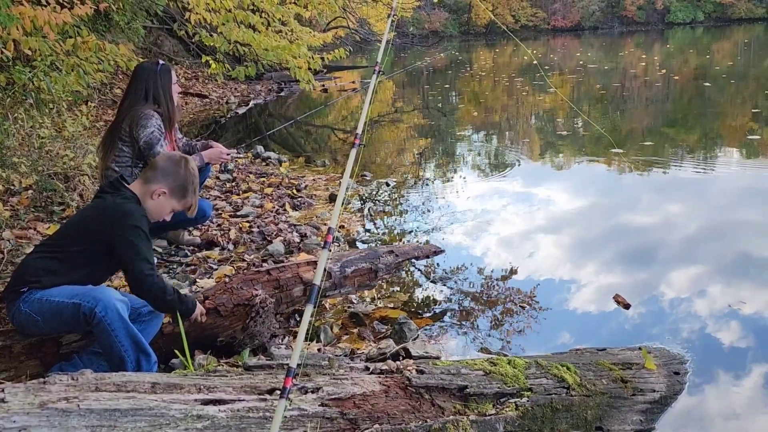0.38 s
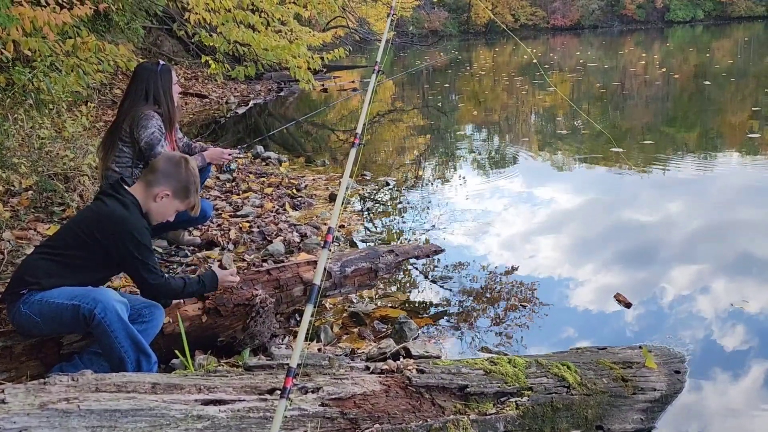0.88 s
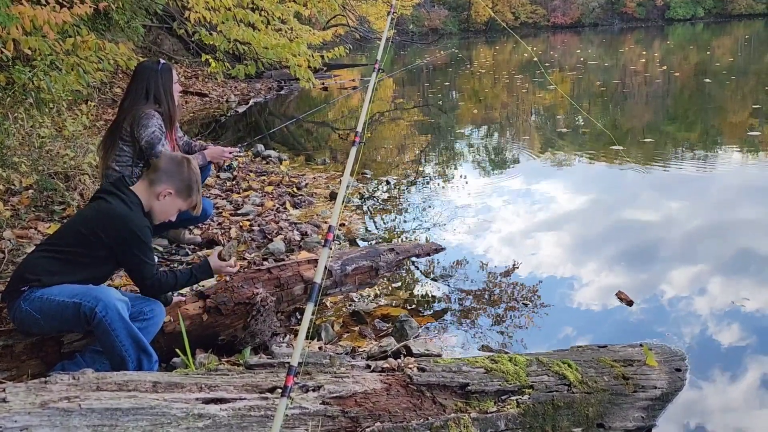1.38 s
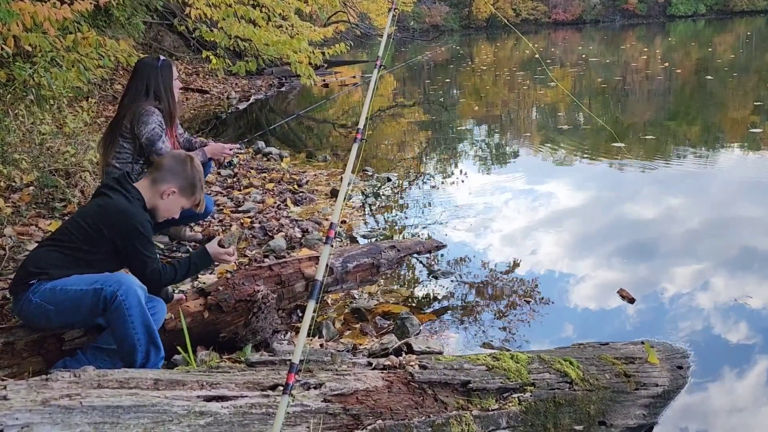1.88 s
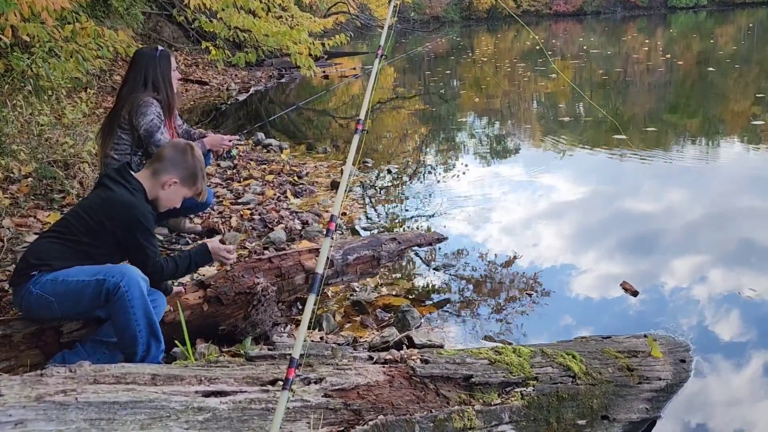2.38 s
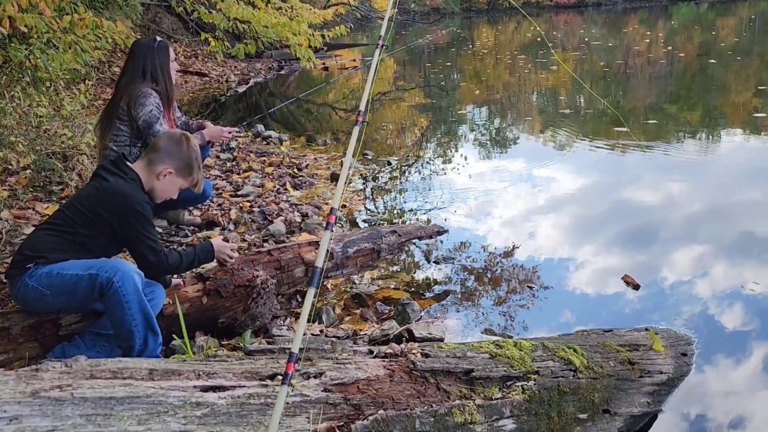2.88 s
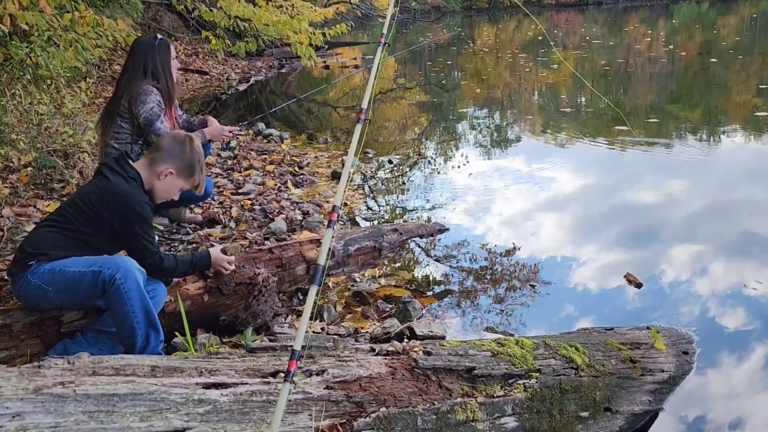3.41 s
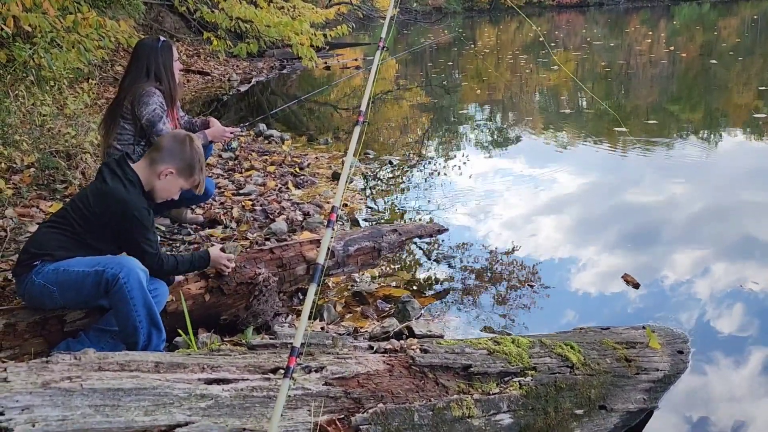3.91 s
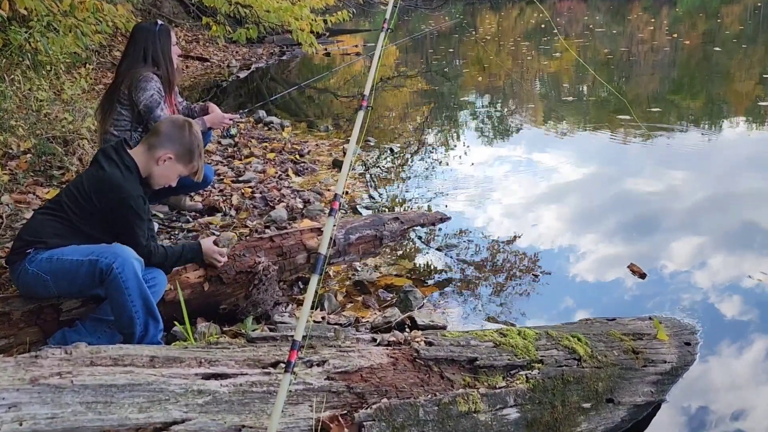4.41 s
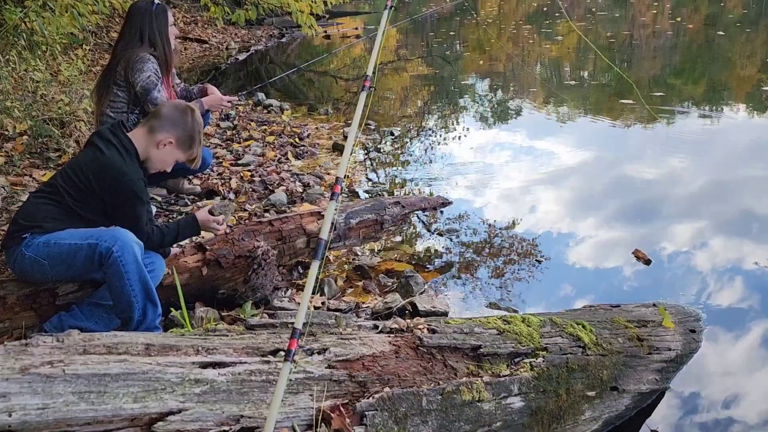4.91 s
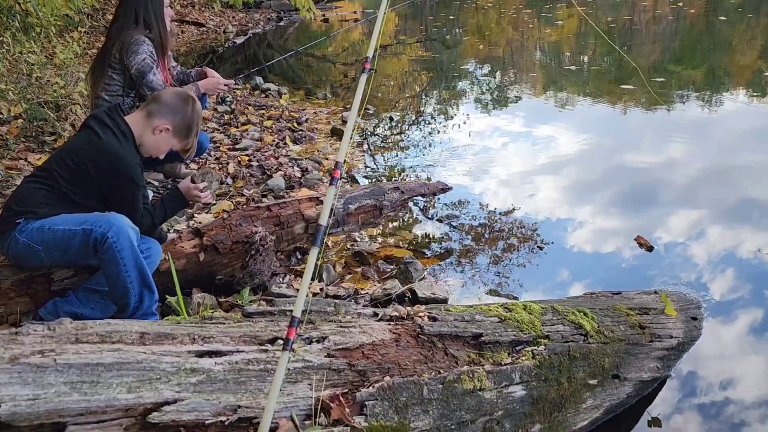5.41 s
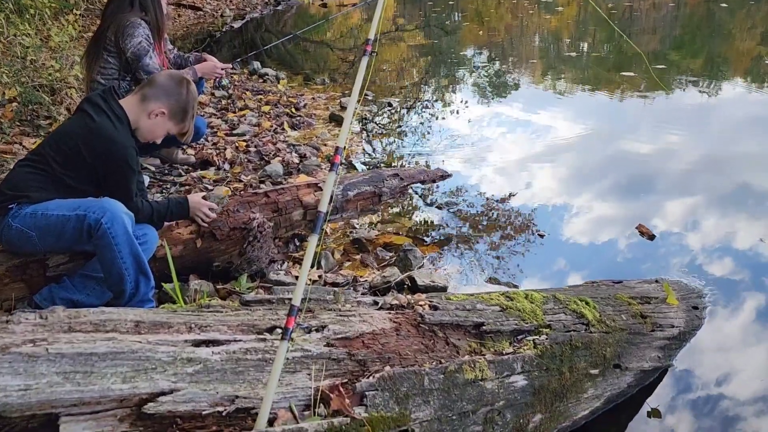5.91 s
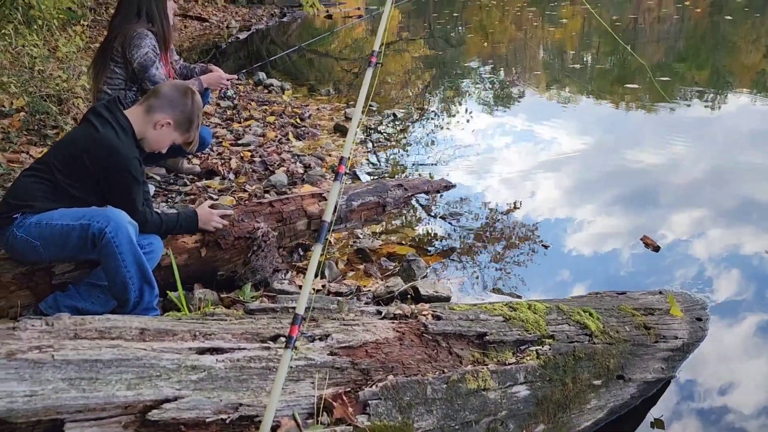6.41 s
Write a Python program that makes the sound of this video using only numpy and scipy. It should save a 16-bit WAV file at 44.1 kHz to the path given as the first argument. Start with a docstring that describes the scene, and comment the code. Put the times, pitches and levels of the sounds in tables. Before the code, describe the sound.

An open lakeside with little echo, heard from a handheld stereo microphone above a walker's feet. A close cricket trills throughout, high tones near 4 to 5 kHz falling rapidly, about 40 strokes per second, quickening to around 50 from 1.6 to 3.6 s and again after 5 s, with small stumbles. Far insects shimmer faintly; distant traffic rumbles low, with weak engine drones in the first second and around 3.5 to 4.5 s. Light taps precede the walk. Hollow wooden footsteps land at about 1.1, 1.6, 2.2, 2.8, 3.4, 4.0, 4.6, 5.1 and 5.8 s: heel click, knock, then short deep thump with slight board rattle. Those at 2.2, 3.4 and 4.0 are loudest; 4.6 is light. Dry ticks and brief cloth swishes fill the gaps, one clearer at 3.6 s, a sharper tap at 5.84, and a last swish at 6.5.

```python
"""A cricket close by trills, switching between a quick and a slow pace, over far insects and distant traffic.
Someone walks along hollow wooden boards by a lake, the phone held above them; each heel clicks, knocks and thumps.
Clothes swish and small things tick and tap between the steps.
The cricket is a train of falling tones; the boards are damped modes struck by smooth pushes;
insects, traffic, grit and cloth are filtered noise, and the engines are gliding sines."""
import sys
import numpy as np
from scipy import signal
from scipy.fft import rfft, irfft
from scipy.io import wavfile
from scipy.ndimage import uniform_filter1d

SR = 44100
rng = np.random.default_rng(int(sys.argv[2]) if len(sys.argv) > 2 else 0)


def log_audio(samples):
    """Write samples as a 16-bit WAV file to the path given in sys.argv[1]."""
    # one column per channel
    frames = np.atleast_2d(samples).T
    # limit to full scale, then quantise
    limited = np.clip(frames, -1, 1)
    pcm = np.round(limited * 32767).astype(np.int16)
    wavfile.write(sys.argv[1], SR, pcm)


def decibels_to_gain(level_db):
    """Convert a level in decibels to a linear amplitude gain (20 dB per decade)."""
    exponent = np.asarray(level_db, float) / 20
    return 10 ** exponent


N = 288529
T = np.arange(N) / SR  # time [s]
SLOW_PACE = 40.083  # wing strokes per s of the cricket at rest


def shape(x, gain):
    """Linear filtering: the spectrum is multiplied by a gain given as a function of frequency."""
    hz = np.fft.rfftfreq(x.shape[-1], 1 / SR) + 1  # 1 Hz up, to avoid zero
    return irfft(rfft(x) * gain(hz), x.shape[-1])


def unit(x):
    """Normalisation by mean power: scale to rms 1."""
    return x / np.sqrt(np.mean(x ** 2))


def bell(hz, width):
    """Simple resonator: gain of a broad resonance."""
    return lambda f: 1 / np.hypot(1, (f - hz ** 2 / f) / width)


def curve(table):
    """Spectral envelope: gain from (frequency [Hz], level [dB]), interpolated over log frequency."""
    hz, db = np.transpose(table)
    return lambda f: decibels_to_gain(np.interp(np.log(f), np.log(hz), db))


def pair(gain, alike_hz, size=N):
    """Spatial coherence: coloured noise at both ports, alike below alike_hz and unrelated above; rms 1."""
    mid, side = rng.standard_normal((2, size))
    side = shape(side, lambda f: f / np.hypot(f, alike_hz))
    return unit(shape(np.array([mid + side, mid - side]), gain))


def walk(rate):
    """Slow modulation: a smoothed random level that takes a new value rate times a second."""
    k = int(SR / rate)
    stairs = np.repeat(rng.standard_normal(N // k + 1), k)
    return 1.6 * uniform_filter1d(uniform_filter1d(stairs, k), k)[:N]


def add(out, x, s, pan_db=0.):
    """Superposition: add a sound at time s, with pan_db as left minus right level."""
    i = max(int(s * SR), 0)
    x = (x * decibels_to_gain(np.array([[pan_db], [-pan_db]]) / 2))[:, :N - i]
    out[:, i:i + x.shape[1]] += x


def pace():
    """Rate modulation: wing strokes per second, slow with quick bouts that speed up, tire and wind down."""
    # quick bouts of the near cricket: (start [s], end [s])
    bouts = [(-3.694, .1084), (1.5771, 3.5747), (5.0478, 7)]
    quick_pace, tiring = 53.864, 1.289  # strokes per s at the start of a bout, and the loss per s
    speed_up_s, wind_down_s = .2532, .1546
    rate = np.full(N, SLOW_PACE)
    for start, end in bouts:
        on = np.clip(T, start, end) - start
        gain = (quick_pace - SLOW_PACE - tiring * on) * np.clip(on / speed_up_s, 0, 1)
        rate = rate + gain * np.exp(-np.maximum(T - end, 0) / wind_down_s)
    return rate


def cricket():
    """Stridulation: each wing stroke is a tone that falls as the file slows; leaves and water scatter it."""
    # the wing catches: (time [s], level change of that stroke [dB])
    catches = [(.158, 0), (1.209, -3), (1.705, -8), (1.807, -10), (1.907, -5), (2.023, -2), (2.121, -7),
               (2.276, -8), (2.411, -14), (2.585, -3), (2.779, -9), (3.012, 0), (3.266, -6), (3.445, -6),
               (3.608, -6), (4.324, 0), (4.378, 0), (5.252, -11), (5.35, -9), (5.467, -5), (5.583, -6),
               (5.738, -1), (5.912, -5), (6.163, -4), (6.474, -8)]
    # the phone turns a little: (time [s], mean stroke level without catches [dB], left minus right [dB])
    turn_path = [(0.0, -57, -0.5), (0.91, -58, -0.5), (2.4, -58, -2), (3.37, -61, -7), (4.3, -61, -4),
                 (5.06, -59, -2.5), (5.6, -55, 0), (6.54, -55, 0)]
    stall, first_stroke = .191, .688  # rhythm lost at each catch and at the outset [strokes]
    start_hz, fall_hz_per_s, lead_s = 4720, 79000, .0073
    rate = pace()
    catch_s, catch_db = np.transpose(catches)
    stalls = stall * np.searchsorted(catch_s + .006, T)
    # the stroke count never runs backwards; it stands still at a stall
    count = np.maximum.accumulate(np.cumsum(rate) / SR - stalls - first_stroke)
    times = T[1:][np.diff(np.floor(count)) > 0]
    slips_db = (np.abs(times[:, None] - catch_s) < .007) @ catch_db
    s, db, pan_db = np.transpose(turn_path)
    chance = rng.standard_normal((len(times), 3))
    voice = np.zeros((2, N))
    for at, slip_db, (a, b, c) in zip(times, slips_db, chance):
        # strokes are cut shorter at the quick pace
        stroke_s = .014 - .00012 * (rate[int(at * SR)] - SLOW_PACE)
        t = T[:int(stroke_s * SR)]
        swell = np.sin(np.pi * (t / stroke_s) ** 1.25) ** .7
        phase = 2 * np.pi * ((start_hz + 20 * a) * t - fall_hz_per_s * t ** 2 / 2)
        tone = np.sin(phase) + decibels_to_gain(-29.5) * np.sin(2 * phase)
        level = decibels_to_gain(np.interp(at, s, db) + slip_db + b)
        add(voice, swell * level * tone, at - lead_s + 0.00027 * c)
    tail = rng.standard_normal((2, 6000)) * 1000. ** (-T[:6000] / .1)  # falls 60 dB in 0.1 s
    tail = tail / np.sqrt(np.sum(tail ** 2, axis=1, keepdims=True))
    scatter = signal.fftconvolve(voice, tail, axes=1)[:, :N]
    tilt = decibels_to_gain(np.interp(T, s, pan_db) / 2)
    # the direct sound reaches the right port 3 samples early
    direct = np.array([tilt * voice[0], np.roll(voice[1], -3) / tilt])
    return direct + decibels_to_gain(-16) * scatter


def insect_chorus():
    """Incoherent summation: many far insects merge into wavering bands of noise."""
    # far insects: (centre [Hz], width of the bell before its fourth power [Hz], mean level [dB])
    bands = [(4090, 1470, -73), (5290, 3200, -84), (7850, 1800, -85.5), (13900, 2600, -93.5)]
    out = np.zeros((2, N))
    for hz, width, db in bands:
        out = out + decibels_to_gain(db + walk(3)) * pair(lambda f: bell(hz, width)(f) ** 4, 1500)
    return out


def traffic():
    """Broadband radiation: rumble and tyre roar are coloured noise that comes and goes."""
    # traffic comes and goes: (time [s], rumble level before its random wander [dB])
    swell_path = [(0.0, -50), (0.9, -51.5), (3.2, -51.5), (3.5, -47.5), (4.9, -51), (5.7, -49),
                  (6.25, -52.5), (6.54, -49)]
    # relative spectral density of the rumble: (frequency [Hz], level [dB])
    rumble_curve = [(15, -25), (30, 0.5), (50, 6), (80, 6), (118, 3.5), (151, -7), (190, 0), (230, -8.5),
                    (310, -12), (500, -25), (900, -54.5)]
    # relative spectral density of the tyre roar: (frequency [Hz], level [dB])
    roar_curve = [(150, -66), (250, -12), (514, -7.5), (778, -13.5), (897, -15.5), (1000, -13.5),
                  (3400, -22), (4420, -75), (7480, -120)]
    tyres_db, tyres_follow = -71, 1  # middle level of the roar, share of the traffic swell that it follows
    traffic_db = np.interp(T, *np.transpose(swell_path))
    out = decibels_to_gain(traffic_db + 0.95 * walk(4.11)) * pair(curve(rumble_curve), 600)
    roar = decibels_to_gain(np.array([[.8], [-.8]])) * pair(curve(roar_curve), 720)  # a little to the left
    roar = roar * decibels_to_gain(tyres_db + tyres_follow * (traffic_db - traffic_db.mean()))
    # the air makes each stretch of the roar swell and sink on its own
    edges_hz = [0, 500, 800, 1300, 2000, SR]
    for low, high in zip(edges_hz, edges_hz[1:]):
        out = out + decibels_to_gain(2 * walk(6)) * shape(roar, lambda f: (f >= low) & (f < high))
    return out


def engines():
    """Frequency modulation: distant engine drones are sines that bend in pitch and waver in level."""
    # distant engines: (mean rms level [dB], pitch as a list of (time [s], frequency [Hz]))
    drones = [(-59.5, [(0, 126.8), (.55, 119), (1.05, 97.9)]), (-63, [(0, 193.7), (.3, 189.7),
              (1., 192.8)]), (-55, [(3.5, 131.7), (3.88, 139), (4.3, 139.7), (4.55, 122)])]
    out = np.zeros((2, N))
    for db, bend in drones:
        s, hz = np.transpose(bend)
        # 0.15 s ramps before the first and after the last pitch point
        fade = np.clip(np.minimum(T - s[0] + .15, s[-1] + .15 - T) / .15, 0, 1)
        phase = 2 * np.pi * np.cumsum(np.interp(T, s, hz)) / SR
        out = out + np.sqrt(2) * fade * decibels_to_gain(db + 2.3 * walk(11.83)) * np.sin(phase)
    return out


def ports(x):
    """Path difference: sound from below reaches the left port first; peak 1."""
    lag = 7  # samples
    return np.array([x, np.roll(x, lag)]) / np.abs(x).max()


def strike(push_ms, scatter_db):
    """Modal radiation: pressure follows the acceleration of the modes under a smooth push."""
    # modes of the boards: (frequency [Hz], acceleration level [dB], time to fall 60 dB without the sole [s])
    modes = [(72.4, -18.5, 0.24), (106.7, 1.5, 0.085), (138.6, -4.5, 0.1), (163.8, -12, 0.13),
             (204.7, -0.5, 0.096), (281, -10.5, 0.13), (350, 3.5, 0.087), (397.3, 4, 0.075),
             (461, 6, 0.089), (520, 7, 0.09), (702, -12, 0.22), (857, 0.5, 0.1), (1113, -8, 0.096),
             (1450, -19, 0.028), (1810, -23, 0.028), (2210, -16, .02), (2900, -15, .015)]
    board_spread = 0.048  # no two boards are tuned alike; relative spread of the high modes
    sole_damps_s = 0.026  # the sole stays down and damps the high modes
    t = T[:SR // 3, None]
    hz, db, t60 = np.transpose(modes)
    chance = rng.standard_normal((3, len(hz)))
    high = hz > 300
    # each blow lands on another spot, and the high modes swing either way under it
    gains = decibels_to_gain(db + scatter_db * chance[0]) * np.where(high, np.sign(chance[1]), 1)
    hz = hz * (1 + board_spread * high * chance[2])
    fade = 1000. ** (-t / t60) * np.exp(-t * high / sole_damps_s)
    move = (gains / hz ** 2 * np.sin(2 * np.pi * hz * t) * fade).sum(axis=1)
    push = np.hanning(int(push_ms * SR / 1000) + 3)
    return np.diff(np.convolve(move, push), n=2)[:len(t)]


def knock(push_ms, scrape_s, low_hz):
    """Light impact: a hard edge meets the grain in quick contacts, too light to bend the whole board."""
    t = T[:800]
    touch = rng.standard_normal(800) * np.exp(-t / scrape_s) * (1 - np.exp(-t / 0.00096))
    x = signal.fftconvolve(strike(push_ms, 0.32), touch)
    return ports(signal.sosfilt(signal.butter(2, low_hz, "high", fs=SR, output="sos"), x))


def light_taps():
    """Contact damping: whatever taps the boards stays in touch and damps the ring."""
    # light taps on the boards: (time [s], level before damping [dB], left minus right [dB])
    tap_list = [(0.239, -44, 7), (0.728, -54, 12), (0.779, -53, 13), (1.157, -46, 5), (1.582, -44, 8),
                (1.866, -53, 0), (1.894, -53.5, 19), (2.047, -53, 16), (5.276, -51.5, 9),
                (5.843, -35.5, 11)]
    out = np.zeros((2, N))
    for s, db, pan_db in tap_list:
        tap = knock(1.23, 0.0017, 220)
        add(out, decibels_to_gain(db) * tap * np.exp(-T[:tap.shape[1]] / .012), s, pan_db)
    return out


def click(hz, width, fade_s):
    """Transient noise: a short burst of grit through a squared resonance; peak 1."""
    t = T[:2048]
    x = pair(lambda f: bell(hz, width)(f) ** 2, 2700, size=2048)
    x = x * (1 - np.exp(-t / .002)) * np.exp(-t / fade_s)
    return x / np.abs(x).max()


def dry_ticks():
    """Impulsive excitation: small things tick as brief resonant bursts, the faint ones at random."""
    # dry ticks: (time [s], peak before panning [dB], centre [Hz], left minus right [dB])
    tick_list = [(1.255, -58, 6140, -5), (2.0893, -47, 6750, -6), (2.733, -62, 5270, 3),
                 (3.1635, -59, 5090, 2.5), (3.5284, -53, 4820, -3), (5.076, -58, 6140, 9),
                 (5.1741, -58, 4860, 2), (5.2788, -50, 4970, 10), (5.3308, -45.5, 4600, 1),
                 (5.5967, -56, 7160, 1.5), (6.4324, -51, 7900, 1)]
    faint_db, faint_hz = -68, 5630
    faint = []
    for a, b, c, d in rng.random(size=(14, 4)):
        faint.append((T[-1] * a, faint_db + 6 * b, faint_hz * (.7 + .6 * c), 12 * (d - .5)))
    for_all = tick_list + faint
    out = np.zeros((2, N))
    for s, db, hz, pan_db in for_all:
        add(out, decibels_to_gain(db) * click(hz, 0.85 * hz, 0.0025), s, pan_db)
    return out


def cloth_swishes():
    """Stick-slip friction: cloth slips in small jerks, heard as swelling bands of noise."""
    # swishes: (middle [s], length at half height [s], rms before the swell [dB], centre [Hz], width [Hz])
    swish_list = [(0.497, 0.038, -69.5, 3000, 9000), (1.278, 0.048, -69, 5750, 4800),
                  (1.33, 0.062, -74, 2000, 2500), (1.658, 0.048, -66.5, 3950, 9000),
                  (2.772, 0.043, -68, 8000, 9000), (3.108, 0.071, -72, 6870, 8000),
                  (3.567, 0.048, -57.5, 3900, 8900), (3.74, 0.063, -73, 7070, 9000),
                  (4.577, 0.028, -61.5, 3500, 7000), (4.753, 0.27, -73.5, 4000, 9000),
                  (4.928, 0.083, -69.5, 7900, 10000), (4.987, 0.033, -64, 1600, 900),
                  (5.035, 0.17, -72, 5900, 600), (5.202, .15, -72.5, 4000, 9000),
                  (5.278, 0.029, -61.5, 3680, 7900), (5.614, 0.094, -71, 4800, 9000),
                  (6.08, .16, -69.5, 7200, 3450), (6.259, 0.075, -68, 7150, 4970),
                  (6.505, 0.11, -59.5, 5150, 9600)]
    out = np.zeros((2, N))
    for s, length, db, hz, width in swish_list:
        size = 2 * int(length * SR)
        jerks = decibels_to_gain(5 * unit(uniform_filter1d(rng.standard_normal(size), size=120)))
        swish = unit(pair(bell(hz, width), 1500, size=size) * jerks)
        add(out, decibels_to_gain(db) * swish * np.hanning(size), s - length, -4.5)  # towards the right
    return out


def rattle(thump):
    """Repeated impact: the loosened board chatters on its joist at each downward swing, less and less."""
    t = T[:len(thump)]
    swing = uniform_filter1d(np.maximum(-thump, 0), size=330)
    swing = swing * (1 - np.exp(-(t / .014) ** 2)) * np.exp(-t / .025)
    chatter = rng.standard_normal(len(thump)) * swing
    x = signal.fftconvolve(strike(0.98, 2.2), chatter)[:len(thump)]
    return ports(signal.sosfilt(signal.butter(2, 330, "high", fs=SR, output="sos"), x))


def footsteps():
    """Impact and modal response: each heel clicks and knocks, then the weight thumps and rattles the board."""
    # heel strikes: (time [s], peak of the bright click [dB], thump peak [dB], knock peak [dB],
    # contact time of the heel edge [ms])
    step_list = [(1.077, -50.5, -24.5, -37.5, 0.3), (1.645, -42, -21.5, -31.5, 0.39),
                 (2.228, -36.5, -13, -30, 0.42), (2.832, -41.5, -21, -30, 0.4),
                 (3.394, -44.5, -10.5, -22.5, 1.9), (4.008, -43, -14, -34, 0.35),
                 (4.584, -40, -30, -27.5, 0.98), (5.136, -52, -20.5, -36, 2),
                 (5.777, -43, -28, -32.5, 0.85)]
    weight_delay_s = .0048  # the body weight follows the heel
    rattle_db = -19.5  # relative to the thump
    out = np.zeros((2, N))
    for s, click_db, thump_db, knock_db, edge_ms in step_list:
        thump = strike(5.6, 1)
        add(out, decibels_to_gain(click_db) * click(6200, 7500, .0042), s, 2.5)
        add(out, decibels_to_gain(click_db - 5.5) * click(1200, 2800, 0.021), s)
        add(out, decibels_to_gain(knock_db) * knock(edge_ms, .0025, 260), s + .0015)
        weight = ports(thump) + decibels_to_gain(rattle_db) * rattle(thump)
        add(out, decibels_to_gain(thump_db) * weight, s + weight_delay_s)
    return out


def scene():
    """Acoustic shadowing: all sources at the two ports; the hand shades the treble, most at the right."""
    far = insect_chorus() + traffic() + engines()
    walker = light_taps() + dry_ticks() + cloth_swishes() + footsteps()
    shade = lambda f: decibels_to_gain(np.array([[-2.5], [-11]]) * np.clip((f - 8200) / 2500, 0, 1))
    return shape(cricket() + far + walker, shade)


def band_limit(x):
    """A steep low-pass at the top of the band."""
    return signal.sosfilt(signal.butter(12, 16270, fs=SR, output="sos"), x)


def record(dry):
    """Band limiting: the phone cuts the deepest bass and the top."""
    x = signal.sosfilt(signal.butter(2, 55, "high", fs=SR, output="sos"), dry)
    x = signal.sosfilt(signal.ellip(8, .2, 60, 15600, fs=SR, output="sos"), x)
    return band_limit(x)


dry = scene()
out = record(dry)
log_audio(out)
```